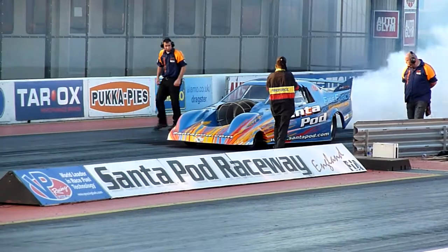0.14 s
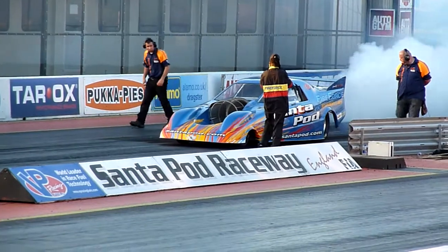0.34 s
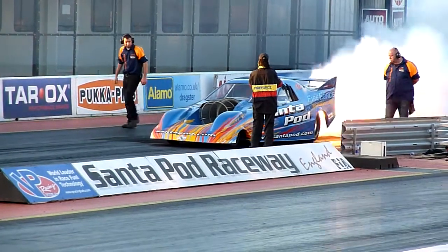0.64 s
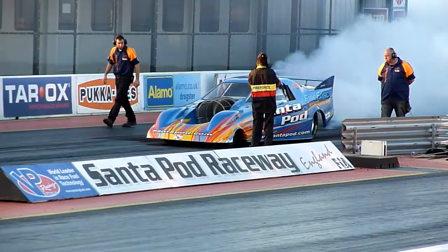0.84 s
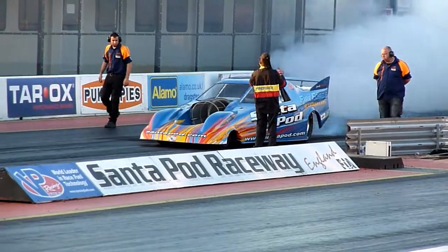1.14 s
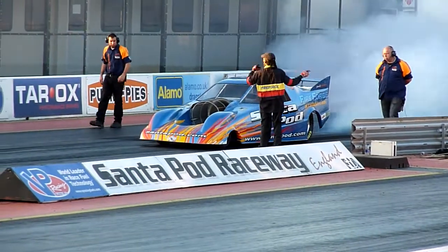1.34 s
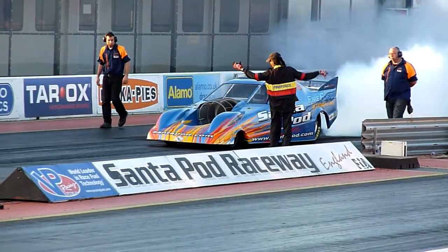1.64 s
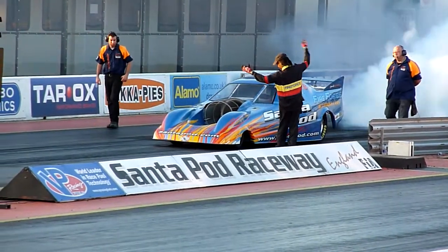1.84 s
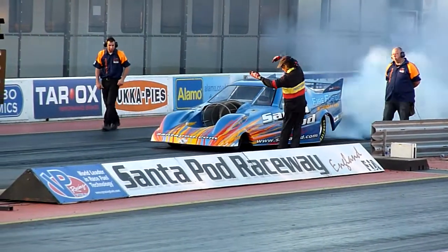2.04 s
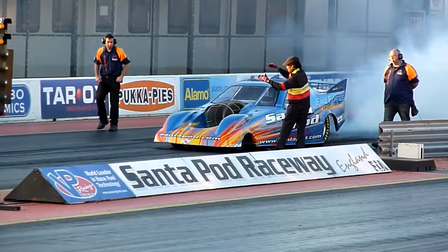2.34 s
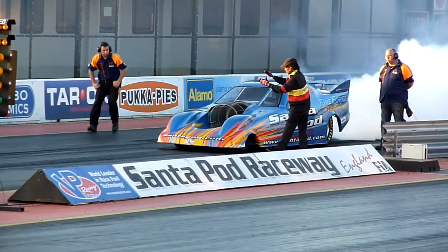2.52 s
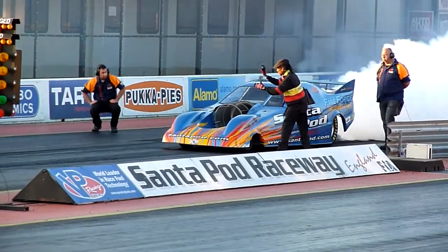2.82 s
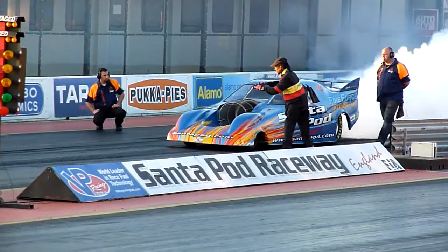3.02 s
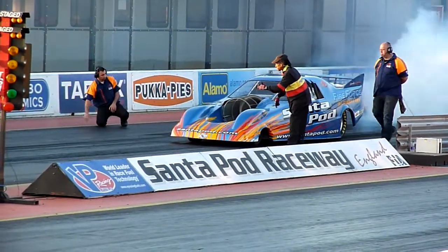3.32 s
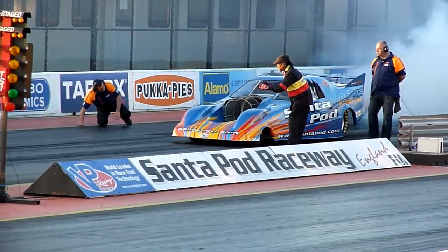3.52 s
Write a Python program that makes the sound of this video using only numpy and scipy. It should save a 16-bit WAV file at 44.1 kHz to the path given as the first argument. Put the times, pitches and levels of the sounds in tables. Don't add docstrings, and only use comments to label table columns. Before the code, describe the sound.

Jet-powered drag car at idle screams shrilly, with four sudden ripping afterburner booms outdoors

```python
import sys
import numpy as np
from scipy import signal
from scipy.fft import rfft, irfft, next_fast_len
from scipy.io import wavfile
from scipy.ndimage import uniform_filter1d

SR = 44100
rng = np.random.default_rng(int(sys.argv[2]) if len(sys.argv) > 2 else 0)


def wrap_up_sound(samples):
    columns = np.atleast_2d(samples).T
    tamed = np.clip(columns, -1, 1)
    steps = np.round(tamed * 32767).astype(np.int16)
    wavfile.write(sys.argv[1], SR, steps)


def invert_db(x):
    u = np.asarray(x, float) / 20
    return 10 ** u


N = 161847
BLADES = 24


def shape(x, table):
    size = next_fast_len(N)
    table = np.array(table, float)
    hz = np.fft.rfftfreq(size, 1 / SR) + 1
    gain_db = np.interp(np.log(hz), np.log(table[:, 0]), table[:, 1])
    return irfft(rfft(x, size) * invert_db(gain_db), size)[:N]


def band(x, hz, width_hz):
    return signal.lfilter(*signal.iirpeak(hz, hz / width_hz, SR), x)


def unit(x):
    return x / np.sqrt(np.mean(x ** 2))


def walk(rate):
    steps = np.repeat(rng.standard_normal(int(N / SR * rate) + 3), 4)
    steps = uniform_filter1d(steps, size=5)
    return unit(np.interp(np.arange(N) * (4 * rate / SR), np.arange(len(steps)), steps))


def curve(table):
    table = np.array(table, float)
    return np.interp(np.arange(N) / SR, table[:, 0], table[:, 1])


def turbulent(table, flicker_db, rate):
    size = next_fast_len(N)
    white = rfft(rng.standard_normal(size))
    octave = np.log2(np.fft.rfftfreq(size, 1 / SR) + 1)
    out = np.zeros(N)
    for centre in range(4, 16):
        part = irfft(white * np.clip(1 - abs(octave - centre), 0, 1), size)[:N]
        out += part * invert_db(flicker_db * walk(rate))
    return unit(shape(out, table))


# start_s, pitch_hz
BLADE_PITCH = [(0, 5560), (.15, 5558), (.27, 5478), (.42, 5545), (.6, 5588), (.8, 5575), (.9, 5440),
               (1.04, 5420), (1.36, 5590), (1.5, 5592), (1.8, 5548), (1.92, 5556), (2.06, 5465),
               (2.33, 5582), (2.6, 5574), (2.85, 5560), (3.15, 5572), (3.67, 5573)]


def shaft_angle():
    turns_per_s = uniform_filter1d(curve(BLADE_PITCH), size=2500) / BLADES
    turns_per_s = turns_per_s * (1 + 0.00034 * walk(24.97))
    return 2 * np.pi * np.cumsum(turns_per_s) / SR + 0.012 * walk(60)


# start_s, level_db
WHINE_LEVEL = [(0, -43), (.26, -28.5), (.32, -42), (.4, -30), (.49, -38), (.62, -30), (.8, -25), (.86, -45),
               (1.12, -31.5), (1.4, -29), (1.51, -40), (1.6, -23.5), (1.8, -33), (1.91, -28.5), (2.1, -41),
               (2.5, -22.5), (2.77, -37), (3.0, -22.5), (3.17, -22), (3.21, -39.5), (3.28, -27.5),
               (3.33, -39.5), (3.45, -36.5), (3.67, -22)]


def blade_tone(turn):
    return invert_db(curve(WHINE_LEVEL) + 1.5 * walk(30.04)) * np.sin(BLADES * turn)


def blade_octave(turn):
    return invert_db(-54 + 4 * walk(25)) * np.sin(2 * BLADES * turn + 1.2 * walk(50))


SHAFT_MULTIPLES = [5, 7, 8, 10, 11, 12, 14, 15, 16, 17, 18, 19, 20, 22, 26, 28, 29, 31, 36, 38, 39, 41, 43,
                   44]
MULTIPLE_LEVELS = [-48, -63, -51, -45, -51.5, -46, -47, -48.5, -60, -44.5, -48, -44, -54, -54, -65, -61,
                   -46, -50.5, -51, -65, -61, -50, -75, -56]


def shaft_orders(turn):
    out = np.zeros(N)
    for multiple, level_db in zip(SHAFT_MULTIPLES, MULTIPLE_LEVELS):
        fading_db = level_db + 1.8 * walk(5) + 2.2 * walk(29.92)
        out += invert_db(fading_db) * np.sin(multiple * turn + 6 * rng.random())
    return out


def blade_turbulence(turn):
    out = np.zeros(N)
    for multiple, level_db, width_hz in ((1, -34.5, 150), (2, -46, 420)):
        lowpass = signal.butter(1, width_hz / 2, fs=SR)
        spread = signal.lfilter(*lowpass, rng.standard_normal((2, N)))
        angle = multiple * BLADES * turn
        hump = unit(spread[0]) * np.sin(angle) + unit(spread[1]) * np.cos(angle)
        out += invert_db(level_db) * hump / np.sqrt(2)
    return out


def compressor(duck_db):
    turn = shaft_angle()
    ducked = shaft_orders(turn) + blade_turbulence(turn) + blade_octave(turn)
    return np.sqrt(2) * (ducked * invert_db(0.56 * duck_db) + blade_tone(turn))


# start_s, level_db
FLAME_LEVELS = [
    [(.175, -33), (.195, -18.5), (.29, -20.5), (.32, -20), (.42, -21), (.5, -28.5), (.62, -35)],
    [(.79, -47), (.808, -12.5), (.835, -17), (.86, -21), (.93, -20.5), (1.03, -19), (1.15, -18.5),
     (1.33, -28), (1.47, -35)],
    [(1.9, -41), (1.93, -17.5), (2.0, -20), (2.1, -17.5), (2.2, -21.5), (2.3, -29), (2.4, -36)],
    [(3.158, -29), (3.18, -15.5), (3.2, -18), (3.22, -21.5), (3.3, -22), (3.32, -30), (3.4, -27),
     (3.55, -32.5), (3.66, -49)],
]
# pitch_hz, level_db [per Hz]
ROAR_COLOUR = [(18, -85), (30, -72), (96, -27), (186, -15), (242, -11), (412, -8), (584, -2.5), (1630, -18),
               (4000, -27), (5200, -38), (8800, -120)]


def flame_roar():
    t = np.arange(N) / SR
    flame = np.zeros(N)
    for table in FLAME_LEVELS:
        table = np.array(table, float)
        flame += invert_db(np.interp(t, table[:, 0], table[:, 1], -99, -99))
    crackle = invert_db(1.1 * walk(200))
    return flame * turbulent(ROAR_COLOUR, 0.81, 29.74) * crackle


# start_s, rip_level_db, rip_length_s, thud_level_db, thud_delay_s
LIGHT_EVENTS = [
    (0.183, -25, 0.098, -36, 0.091),
    (0.794, -25, 0.068, -36, 0.097),
    (1.915, -27.5, 0.098, -36, 0.1),
    (3.166, -26, 0.017, -34, .112),
]


def ignition_rip():
    t = np.arange(N) / SR
    hz, width_hz, rise_s, fall_s = 1670, 2440, 0.0049, 0.025
    rip = np.zeros(N)
    for start_s, level_db, length_s, _, _ in LIGHT_EVENTS:
        rise = np.clip((t - start_s) / rise_s, 0, 1)
        fall = np.exp(-np.clip(t - start_s - length_s, 0, None) / fall_s)
        rip += invert_db(level_db) * rise * fall
    noise = band(rng.standard_normal(N), hz, width_hz)
    bright = unit(band(noise, hz, width_hz))
    return rip * bright * invert_db(2 * walk(90))


def wall_thud():
    t = np.arange(N) / SR
    hz, width_hz, swell_s, kick_db = 97.7, 220, 0.018, -12
    gust = unit(band(rng.standard_normal(N), 1.8 * hz, width_hz))
    thud = np.zeros(N)
    for start_s, _, _, level_db, delay_s in LIGHT_EVENTS:
        for late_s, db in ((0, level_db + kick_db), (delay_s, level_db)):
            u = np.clip(t - start_s - late_s, 0, None) / swell_s
            swell = u * np.exp(1 - u)
            thud += invert_db(db) * swell * (np.sin(2 * np.pi * hz * swell_s * u) + gust)
    return band(thud, hz, width_hz)


def afterburner():
    return flame_roar() + ignition_rip() + wall_thud()


# start_s, level_db
INTAKE_LEVEL = [(0, -33), (.15, -32), (.28, -36.5), (.32, -41.5), (.4, -36.5), (.62, -34.5), (.8, -36),
                (.92, -43.5), (1.15, -42.5), (1.36, -41), (1.56, -36), (1.92, -34), (2.08, -41.5),
                (2.45, -35), (2.9, -34), (3.17, -36), (3.31, -46), (3.42, -40.5), (3.67, -37.5)]


def gain_riding():
    return curve(INTAKE_LEVEL) + 36


# pitch_hz, level_db [per Hz]
HISS_COLOUR = [(880, -30), (1500, -31.5), (2110, -19), (2310, -10.5), (3690, -9.5), (5510, -4), (7840, -16),
               (11500, -12.5), (15600, -34.5)]
HISS_FOLLOW = 0.59


def intake_hiss(duck_db):
    level_db = -28.5 + HISS_FOLLOW * duck_db + walk(40)
    return turbulent(HISS_COLOUR, 0.49, 20) * invert_db(level_db)


def treble_riding(intake, duck_db):
    lowpass = signal.butter(2, 6800, fs=SR, output="sos")
    dull = signal.sosfiltfilt(lowpass, intake)
    return dull + (intake - dull) * invert_db((1.32 - HISS_FOLLOW) * duck_db)


# pitch_hz, level_db [per Hz]
RUMBLE_COLOUR = [(15, -79), (25, -40), (216, -9.5), (294, -8), (350, -7.5), (425, -7), (612, -2),
                 (1460, -10.5), (2500, -18.5), (3250, -36), (5500, -120)]


def exhaust_rumble(duck_db):
    return turbulent(RUMBLE_COLOUR, 0.54, 7.9) * invert_db(-31.5 + 0.22 * duck_db)


# pitch_hz, level_db
SCATTER_WIDTH = [(60, -20), (110, -28), (200, -37), (380, -37), (700, -33), (1290, -23), (2380, -14),
                 (4400, -9), (8120, -8), (15000, -7)]
# pitch_hz, level_db
PORT_LEAN = [(20, -70), (6000, -55), (12000, -19), (20000, -14)]


def two_ports(mid):
    late = [np.roll(mid, lag) * walk(40) for lag in (90, 230)]
    side = shape(sum(late) / np.sqrt(2), SCATTER_WIDTH) + shape(mid, PORT_LEAN)
    return np.array([mid + side, mid - side])


# pitch_hz, level_db
TOP_EDGE = [(20, 0), (15080, 0), (15160, -9), (22050, -14)]


def scene():
    duck_db = gain_riding()
    intake = treble_riding(compressor(duck_db) + intake_hiss(duck_db), duck_db)
    mid = intake + afterburner() + exhaust_rumble(duck_db)
    return two_ports(shape(mid, TOP_EDGE))


def roll_off(x):
    return signal.sosfilt(signal.butter(12, 15700, fs=SR, output="sos"), x)


def record(dry):
    notched = dry - 0.75 * band(dry, 7880, 560)
    bass_cut = signal.butter(2, 65, "high", fs=SR, output="sos")
    mix = signal.sosfilt(bass_cut, notched)
    return roll_off(mix)


dry = scene()
out = record(dry)
wrap_up_sound(out)
```